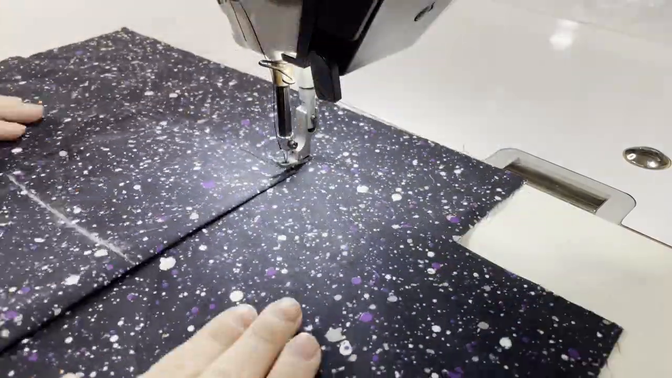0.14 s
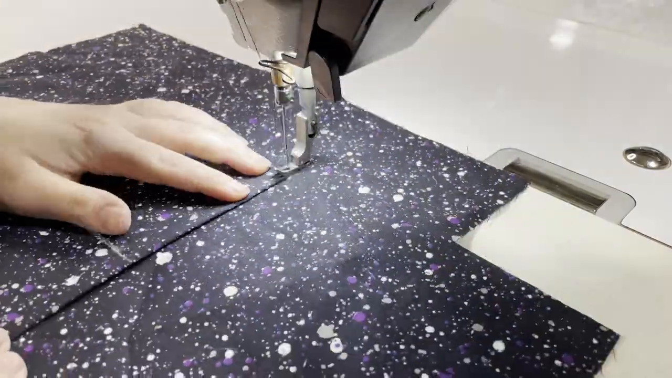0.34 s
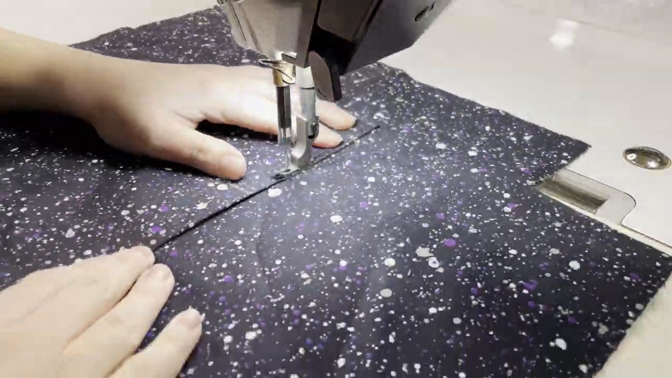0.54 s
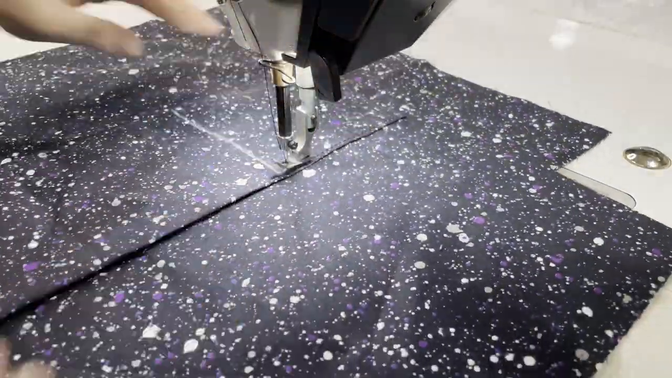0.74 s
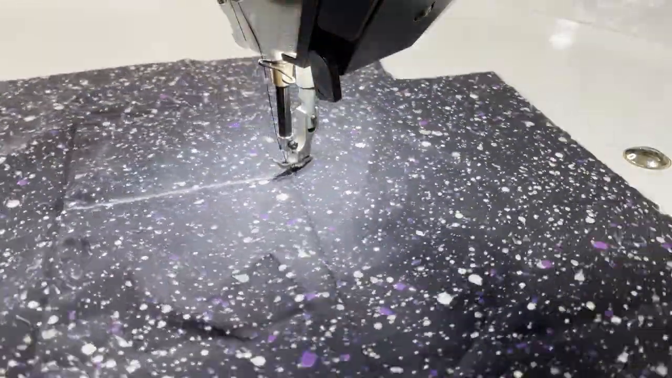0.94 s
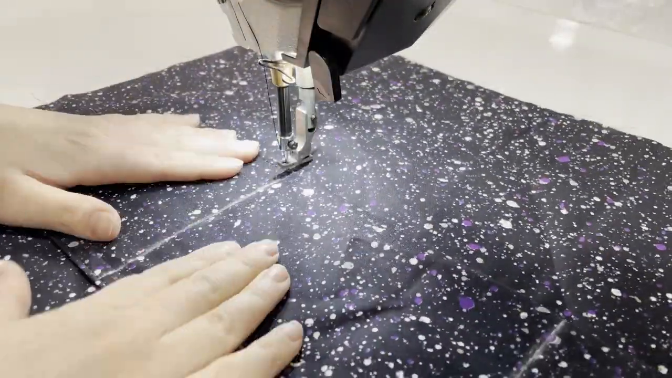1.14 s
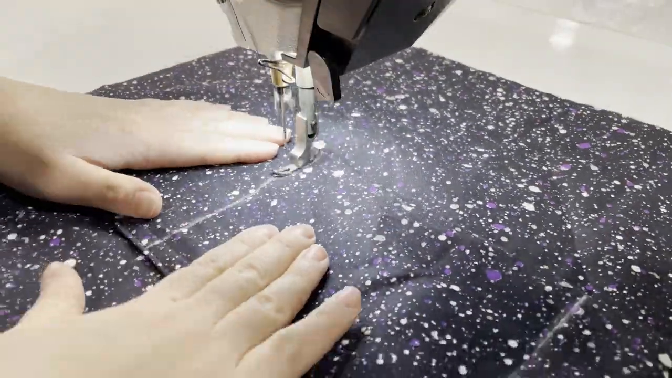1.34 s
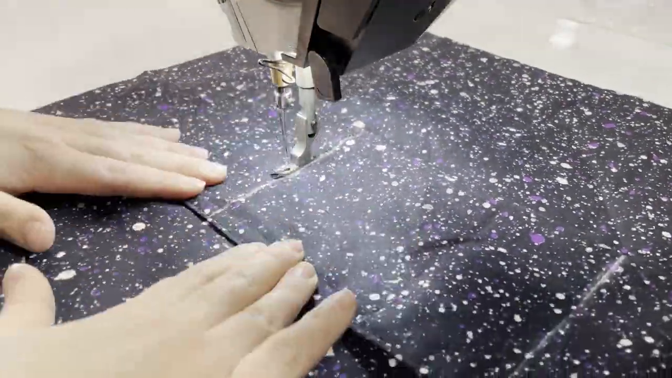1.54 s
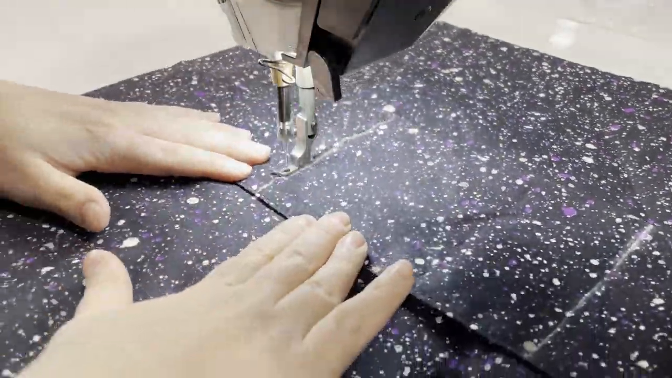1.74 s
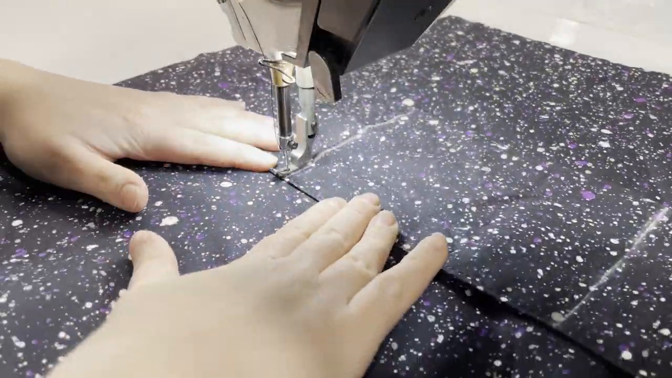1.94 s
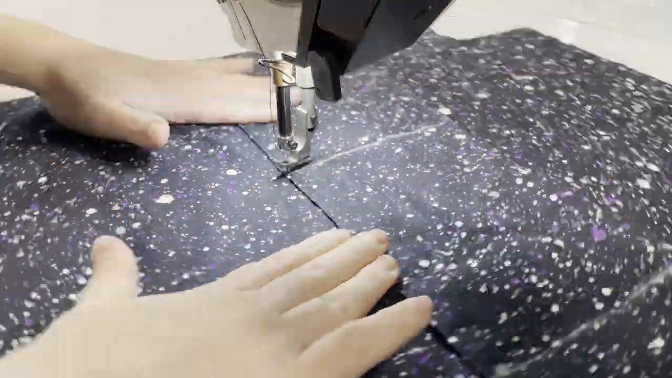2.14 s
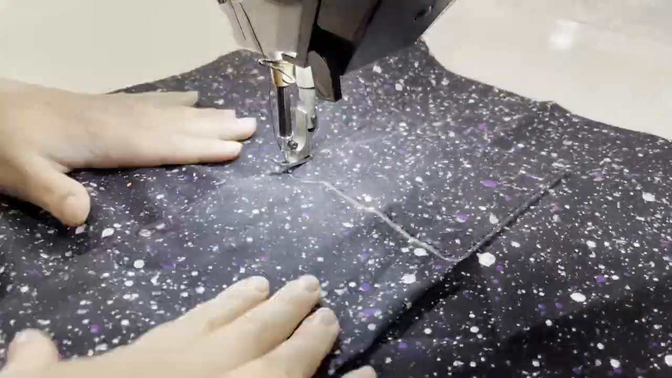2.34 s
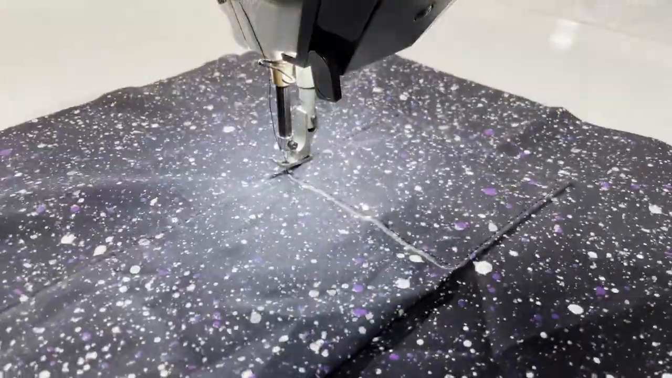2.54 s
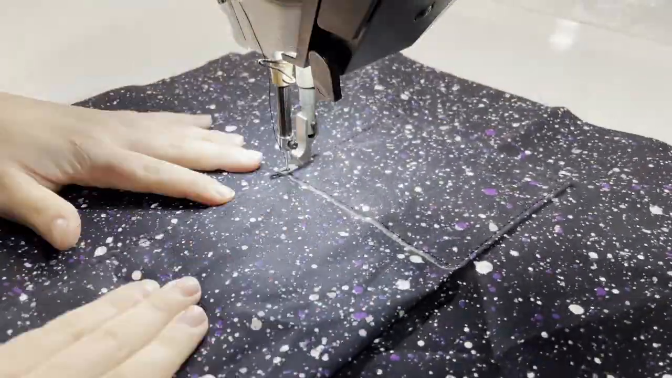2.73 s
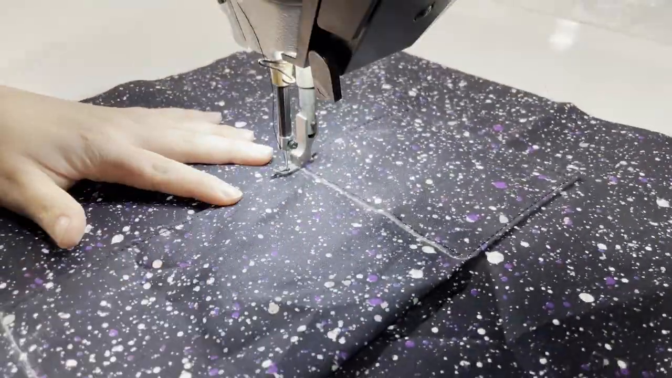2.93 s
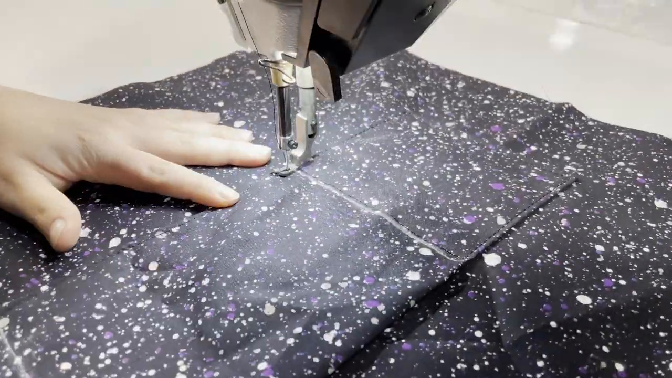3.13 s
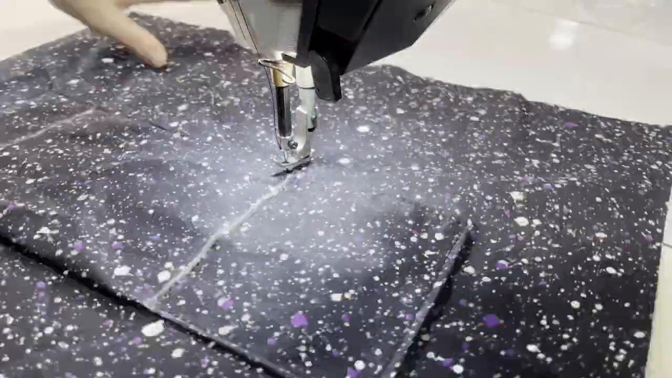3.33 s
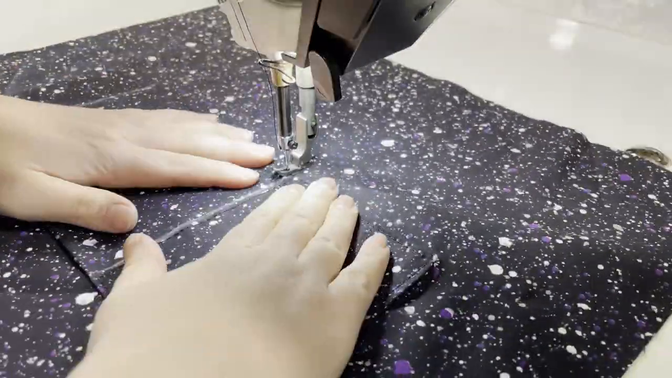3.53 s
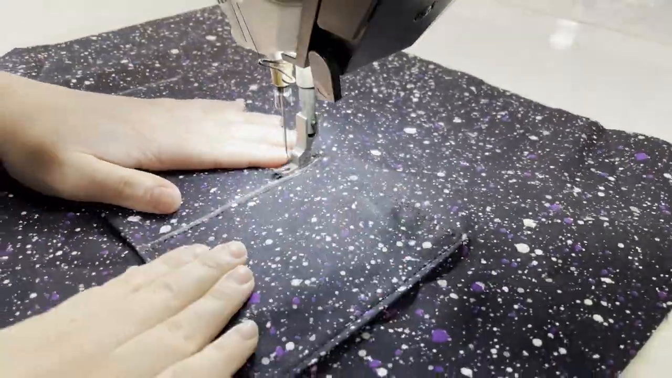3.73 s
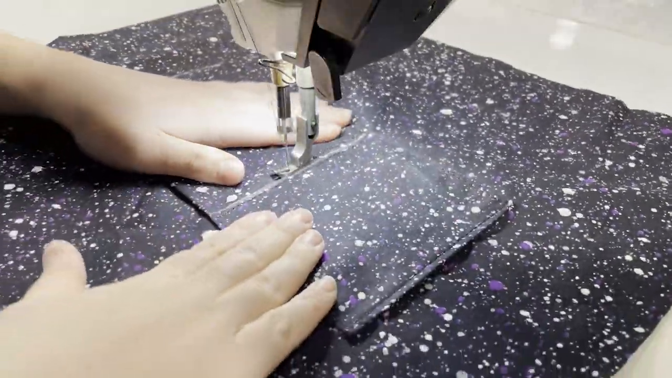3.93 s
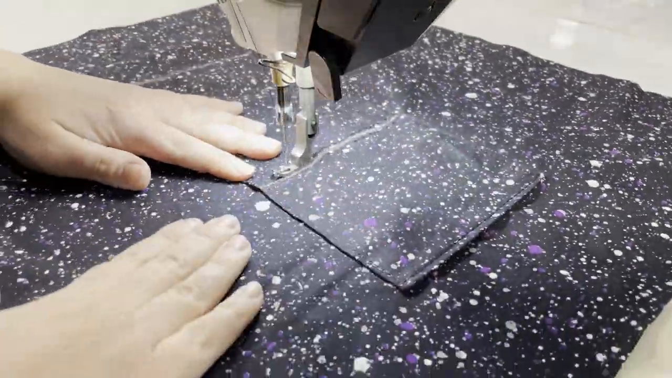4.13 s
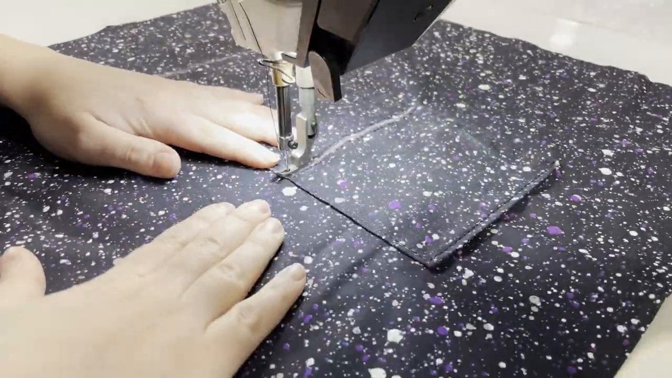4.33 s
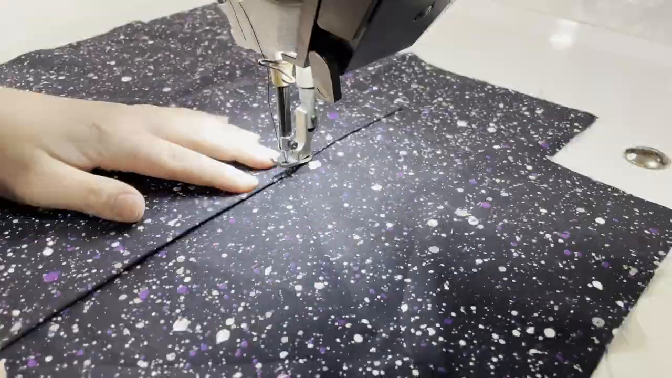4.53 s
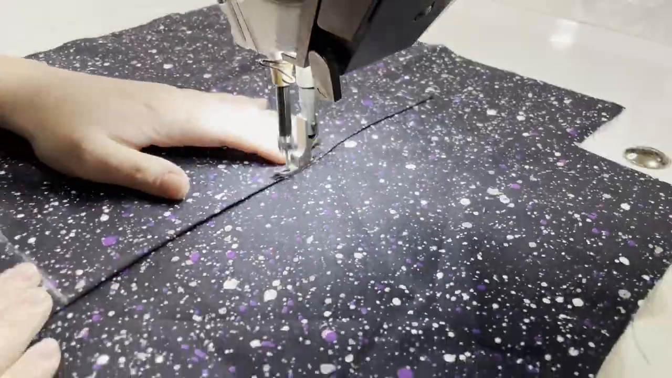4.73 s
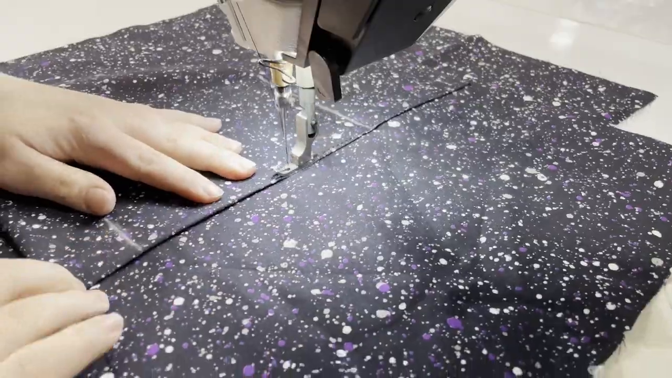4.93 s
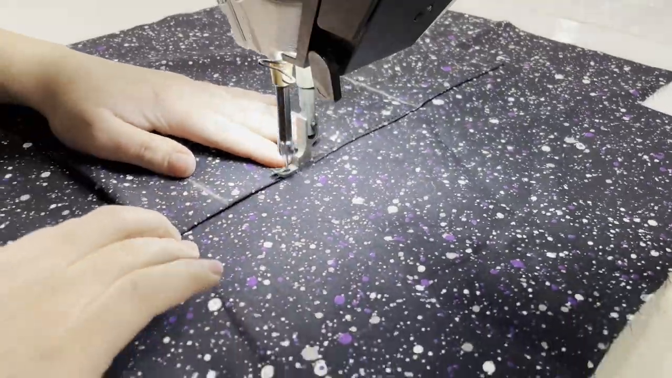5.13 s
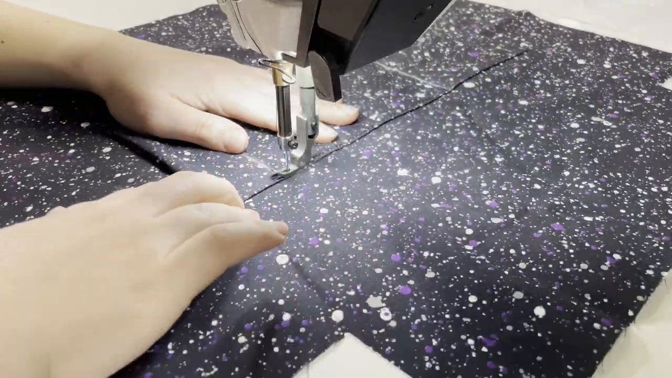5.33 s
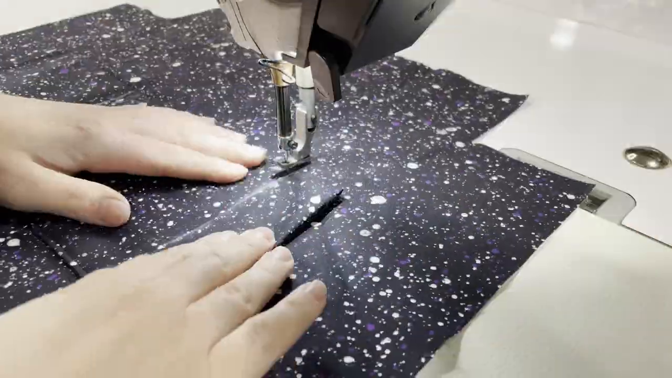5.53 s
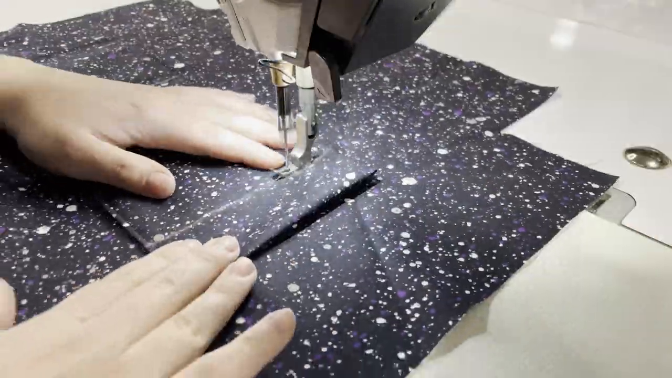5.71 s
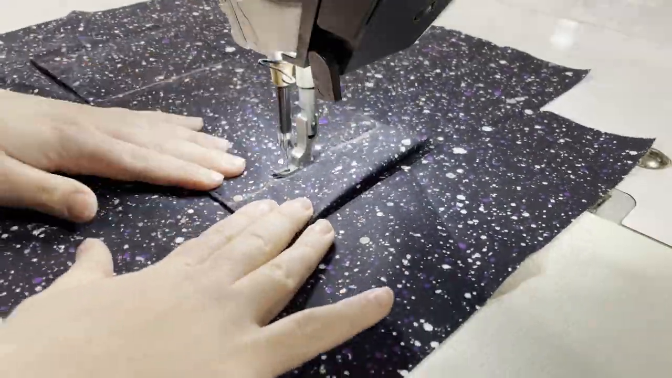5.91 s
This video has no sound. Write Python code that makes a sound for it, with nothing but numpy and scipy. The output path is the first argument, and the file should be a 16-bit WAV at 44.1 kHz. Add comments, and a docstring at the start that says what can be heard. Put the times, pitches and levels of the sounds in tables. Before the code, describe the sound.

A fast sewing machine, heard very close, stitches in six sharp rattling bursts separated by clacks, ticks and soft rustling of cloth.

```python
"""Fast sewing machine, close by

A sewing machine stitches in bursts. Each stitch excites the arm's resonances at seven contacts, the two strongest
half a turn apart, and pings the hook, while gears and thread hiss in step with the shaft. A solenoid clacks and
a clutch ticks around the bursts as impulses on resonators, a lever squeaks by slipping repeatedly, hands tap and
rustle the cloth as damped noise and tones, and the idling drive is steady shaped noise with a faint hum.
"""
import sys
import numpy as np
from scipy import signal
from scipy.fft import rfft, irfft, next_fast_len
from scipy.io import wavfile
from scipy.ndimage import uniform_filter1d, map_coordinates

SR = 44100
rng = np.random.default_rng(int(sys.argv[2]) if len(sys.argv) > 2 else 0)


def waveform_to_disk(signal):
    """Save audio, clipped to [-1, 1], as 16-bit WAV at the path in sys.argv[1]."""
    frames = np.transpose(np.atleast_2d(signal))
    scaled = np.clip(frames, -1, 1) * 32767
    samples = np.round(scaled).astype(np.int16)
    wavfile.write(sys.argv[1], SR, samples)


N = 267687
T = np.arange(N) / SR

# resonances of the lever: f/Hz, width/Hz, level/dB
LEVER_MODES = [(1360, 34, -10), (3826, 140, 1), (3930, 420, -25), (4960, 160, -18), (7460, 250, -5),
               (11200, 960, -14)]
# speed of the stitching, held in plateaus with quick steps, one list per burst: t/s, speed/(stitches/s)
SPEED_STEPS = [
    [(.3715, 41.9), (.393, 87), (.416, 109.74), (.4889, 86.6), (.512, 76.9), (.551, 67.95), (.6393, 54.5),
     (.676, 35.2), (.73, 0)],
    [(1.283, 72), (1.2955, 83.25), (1.3916, 67.57), (1.436, 54.05), (1.473, 33.33), (1.623, 37.74),
     (1.676, 44.94), (1.8095, 41.15), (1.931, 21), (1.95, 0)],
    [(2.8, 37.25), (2.851, 33.3), (2.893, 0)],
    [(3.589, 39.1), (3.612, 33.9), (3.671, 37.38), (3.778, 41.67), (3.802, 52.63), (4.0263, 41.53),
     (4.2477, 34.9), (4.32, 0)],
    [(4.656, 45), (4.676, 66.7), (4.691, 74.63), (4.758, 68.18), (4.802, 60), (4.852, 45.45), (4.94, 47.62),
     (4.982, 60.6), (5.015, 64.15), (5.285, 52.5), (5.317, 33.3), (5.36, 0)],
    [(5.645, 47.4), (5.664, 71.4), (5.678, 79.79), (5.7908, 70.9), (5.819, 64.9), (5.896, 52.79), (6.07, 0)],
]
# starts of the slow turns that park the needle: t/s
PARK_STARTS = [2.010, 3.089, 4.373, 5.403]
PARK_S = .047  # duration of each parking turn, s


def amp(db):
    """Amplitude ratio from a level in dB: 20 dB is a factor of ten."""
    return 10 ** (np.asarray(db) / 20)


def unit(x):
    """Normalization to unit rms amplitude."""
    return x / np.sqrt(np.mean(x ** 2) + 1e-20)


def along(points, hz):
    """Interpolation of (f/Hz, value) points, linear on a logarithmic frequency axis."""
    f, value = np.transpose(points)
    return np.interp(np.log(hz + 1), np.log(f + 1), value)


def gain(tables, col=1):
    """Amplitude envelope from level curves linear in dB, practically silent between the tables."""
    total = 0
    for rows in tables:
        t, db = np.transpose(rows)[[0, col]]
        total = total + amp(np.interp(T, t, db, -200, -200))
    return total


def wobble(rate):
    """Slow random modulation: a smooth curve through rate random knots per second."""
    knots = rng.standard_normal(int(N * rate / SR) + 4)
    return map_coordinates(knots, [T * rate])


def filtered(x, response):
    """Linear filtering: the spectrum is multiplied by a complex frequency response."""
    m = next_fast_len(N + SR // 2)
    f = np.fft.rfftfreq(m, 1 / SR)
    return irfft(rfft(x, m) * response(f), m)[..., :N]


def modes(table):
    """Modal superposition: damped resonators of f/Hz, width/Hz, level/dB, with alternating signs."""
    def response(f):
        total = 0
        for k, (centre, width, db) in enumerate(table):
            damping = 1j * f * width
            total = total + (-1) ** k * amp(db) * damping / (centre ** 2 - f ** 2 + damping)
        return total
    return response


def bursts(times, db, t60, hold=0.):
    """Exponential decay: an envelope that jumps at each time, holds and falls 60 dB in t60 seconds."""
    t = np.arange(SR // 8) / SR
    starts = np.bincount((np.asarray(times) * SR).astype(int).clip(0, N - 1), amp(db), N)
    decay = amp(-60 * np.maximum(t - hold, 0) / t60)
    return np.abs(signal.fftconvolve(starts, decay)[:N])


def hiss(response):
    """Partial coherence: mid and side noises mix into a band-limited stereo noise of rms 1."""
    # correlation of the two ports: f/Hz, share in common 0-1
    coherence = [(100, 0.84), (1400, 0.57), (3000, 0.84), (6000, 0.33), (15000, 0.46)]
    top_hz = 15750

    def shares(hz):
        angle = np.arccos(np.clip(along(coherence, hz), 0, 1)) / 2
        return response(hz) * (hz < top_hz) * [np.cos(angle), np.sin(angle)]
    mid, side = filtered(rng.standard_normal((2, N)), shares)
    return unit(np.array([mid + side, mid - side]))


def rest():
    """Broadband noise of the idling drive and the room, coloured by a few bands, over a faint tonal hum."""
    # spectrum of the hiss: f/Hz, relative density level/dB
    spectrum = [(88, -73), (150, -31.5), (586, -6.5), (1460, -12.5), (1580, -12.5), (2620, -0.5),
                (3310, -12), (4100, -2.5), (4610, -11), (7210, -3), (8760, -14), (9650, -6.5),
                (10400, -14.5), (13400, -18.5), (15700, -23.5)]
    # broad resonances added to it: f/Hz, width/Hz, level/dB
    broad_bands = [(2850, 600, -6.5), (4140, 1100, -12.5), (6980, 260, -7), (8070, 430, 0), (9520, 190, 5)]

    def colour(hz):
        bands = np.abs(modes(broad_bands)(hz))
        return amp(along(spectrum, hz)) * (0.93 + 0.62 * bands)
    noise = hiss(colour)
    hum = amp(-72 + 2.5 * wobble(8)) * np.sin(2 * np.pi * 593 * T)
    level = amp(-54 + 0.72 * wobble(1.3) + 1.57 * wobble(30.07))
    return level * noise + hum


def room(x):
    """Reverberation: convolution with noise whose decay time depends on frequency, independent at each port."""
    # reverberation time: f/Hz, t60/s
    decay_times = [(300, 0.12), (2000, 0.091), (10000, 0.041)]
    hz, t, z = signal.stft(rng.standard_normal((2, SR // 4)), SR, nperseg=256)
    decay = amp(-60 * t / along(decay_times, hz)[:, None])
    tail = signal.istft(z * decay, SR, nperseg=256)[1]
    tail = tail / np.linalg.norm(tail[0])
    delayed = np.pad(x, (100, 0))[None]  # 100 samples later than the direct sound
    return signal.fftconvolve(delayed, tail, axes=1)[:, :N]


def hands():
    """Heavily damped impacts: soft taps of a few cycles plus noise, among many faint rustles of cloth."""
    # taps of fingers and cloth on the table: t/s, relative level/dB, f/Hz
    tap_events = [(0.818, -52.5, 1260), (0.936, -56.5, 1280), (1.109, -54, 855), (1.181, -61, 620),
                  (2.226, -51, 1440), (2.245, -59, 668), (2.267, -58, 576), (2.301, -54, 730),
                  (2.381, -68, 600), (2.416, -55, 1380), (2.472, -57, 1200), (2.498, -49, 530),
                  (2.511, -53, 587), (2.539, -55, 517), (2.584, -60, 1400), (2.643, -62, 651),
                  (2.739, -60, 820), (2.944, -55.5, 536), (3.363, -53, 1060), (3.401, -49.5, 1160)]
    taps, t = np.zeros(N + SR), np.arange(SR // 20) / SR
    for s, db, hz in tap_events:
        decay = amp(db + 12.0 - 60 * t / 0.016)
        tap = np.sin(2 * np.pi * hz * t) + 1.35 * rng.standard_normal(len(t))
        taps[round(s * SR):][:len(t)] += decay * tap
    at = rng.uniform(0, N / SR, 150)
    rustle_db = -62 + 4 * rng.standard_exponential(len(at))
    rustle = bursts(at, rustle_db, 0.035) * rng.standard_normal(N)
    soften = lambda f: 1j * f / (450 + 1j * f) / (1 + 1j * f / 1500) ** 2
    return filtered(taps[:N] + rustle, soften)


def lever():
    """Stick-slip friction: a squeak is a train of short scrapes, each ringing the lever's resonances."""
    # squeaks: t/s, length/s, relative peak level/dB, place of the peak 0-1
    squeaks = [(2.995, .012, -29, .01), (3.015, .013, -31, .7), (3.089, .004, -41, .1),
               (3.119, .021, -32, .7), (3.182, .016, -33, .4), (3.213, .021, -33, .45)]
    gap_s, scatter = .0055, .08  # time between slips and its random share
    fall_db = 12  # fall over a whole length away from the peak
    chance = rng.standard_normal((len(squeaks), 6, 2))
    start, length, peak_db, peak_at = np.transpose(squeaks)[..., None]
    place = gap_s * np.arange(6) * (1 + scatter * chance[..., 0]) / length
    slip_db = peak_db - fall_db * np.abs(place - peak_at) + 4.5 * chance[..., 1]
    inside = place < 1
    s, db = (start + place * length)[inside], slip_db[inside]
    scrape = bursts(s, db + 11, 0.013, 0.0016) * rng.standard_normal(N)
    impulse = bursts(s, db + 26.5, 0.00021)
    return filtered(scrape + impulse, modes(LEVER_MODES))


def solenoids():
    """Impact excitation: clacks strike, shake and bounce in a resonant housing; bright ticks ping the lever."""
    # presser-foot solenoid: t/s, relative level/dB, brightness/dB
    clacks = [(0.003, -25.5, -16.5), (0.316, -29, -20.5), (0.753, -31.5, -20), (1.228, -30, -20),
              (2.13, -32, -21.5), (2.71, -31, -21), (3.269, -32.5, -21), (3.534, -29.5, -20.5),
              (4.446, -32, -21.5), (4.604, -29.5, -21.5), (5.46, -31.5, -21), (5.59, -30.5, -20)]
    # clutch ticks: t/s, relative level/dB
    clutch_ticks = [(0.3722, -28), (1.283, -28.5), (2.0108, -25), (2.8012, -28.5), (3.0884, -27),
                    (3.1317, -26.5), (3.5895, -27.5), (4.373, -28.5), (4.6556, -28.5), (5.4035, -29.5),
                    (5.645, -26)]
    # spectrum of a tick: f/Hz, relative density level/dB
    tick_spectrum = [(3000, -70), (3800, 2), (5000, -45), (7500, 1.5), (10000, -9.5), (13500, -3.5),
                     (16500, -10)]
    # resonances of the solenoid's housing: f/Hz, width/Hz, level/dB
    housing_modes = [(814, 230, -1.5), (1296, 107, 3), (1430, 82, -3), (1950, 123, 5), (2590, 350, -0.5),
                     (2820, 350, 4), (3750, 230, 3.5), (3780, 340, 0)]

    def noise(points):
        return unit(filtered(rng.standard_normal(N), lambda hz: amp(along(points, hz))))

    s, db, bright_db = np.transpose(clacks)
    shake = bursts(s + 0.001, db - 2.5, 0.0073, 0.0075) + bursts(s + .001, db - 17.0, 0.041, 0.016)
    shake = shake * rng.standard_normal(N)
    strike = bursts(s + 0.001862, db + 19.0, 0.00014)
    bounce = bursts(s + 0.0073, db + 6, 0.00028)
    body = filtered(strike + bounce + shake, modes(housing_modes))
    snap_noise = noise([(4500, -8), (5500, 2.5), (16500, -5)])  # f/Hz, density level/dB
    snap = bursts(s + 0.00027, db + bright_db + 13.5, 0.02) * snap_noise

    s, db = np.transpose(clutch_ticks)
    tick = (bursts(s, db - 3, 0.0042, 0.00036) + bursts(s, db - 18, 0.046)) * noise(tick_spectrum)
    spark = filtered(bursts(s, db + 15, .00005), lambda hz: amp(along(tick_spectrum, hz)))
    table_shake = lambda f: 1j * f / (40 + 1j * f) / (1 + 1j * f / 120) ** 2
    thud = filtered(bursts(s, db - 22.5, .03, 0.0018), table_shake)
    lever_ping = filtered(bursts(s + .001, db + 5, 0.00019), modes(LEVER_MODES[1:2]))
    return thud + body + snap + tick + spark + lever_ping


def shaft():
    """Rotation as integrated speed: sample times, stitches done and speed for each burst and parking turn."""
    run_from, park_from = -.9, .06  # shaft position at the start, stitches
    park_rate = 19  # stitches/s
    step_s = .012  # time the shaft takes to reach a new speed
    plans = [(rows, run_from) for rows in SPEED_STEPS]
    plans += [([(s, park_rate), (s + PARK_S, 0)], park_from) for s in PARK_STARTS]
    out = []
    for rows, start in plans:
        s, rate = np.transpose(rows)
        t = np.arange(s[0], s[-1], 1 / SR)
        steps = rate[np.searchsorted(s, t, "right") - 1]
        speed = uniform_filter1d(steps, size=int(step_s * SR))
        out.append((t, start + np.cumsum(speed) / SR, speed))
    return out


def turns():
    """Phase and rate of the rotation: stitches done and stitches/s at each sample."""
    parts = shaft()
    done = sum(np.interp(T, t, d) for t, d, v in parts)
    speed = sum(np.interp(T, t, v, 0, 0) for t, d, v in parts)
    return done, speed


def moments(offset, jitter):
    """Periodic excitation: times in s at which the shaft passes one angle, with random jitter in s."""
    angles = np.arange(-1, 45) + offset
    s = np.concatenate([np.interp(angles, done, t, -1, -1) for t, done, v in shaft()])
    return (s + jitter * rng.standard_normal(len(s)))[s > 0]


def drive():
    """Power laws of speed, scaled by load: whirr and upper modes grow, knocks stay nearly level."""
    # loading of the needle by the cloth, one list per burst: t/s, load/dB, gear hiss/dB
    loads = [
        [(.372, -9, 0), (.405, 1.5, 1.5), (.55, -1, 0.5), (.65, -1, 0.5), (.71, 0.5, -0.5), (.73, -11, -8)],
        [(1.283, -4.5, -4), (1.33, 2, 0), (1.45, 1, 0), (1.49, -2, 1.5), (1.65, -1.5, -1), (1.71, 1, 4),
         (1.79, 0, 4.5), (1.87, 0.5, -0.5), (1.95, -5.5, 0.5)],
        [(2.8, 2.5, -2.5), (2.893, 0.5, 1.5)],
        [(3.589, 5.5, 2), (3.63, -5, 0.5), (3.77, -1, 0), (3.82, -1.5, 0), (4.15, 1.5, 0), (4.3, -0.5, 0.5),
         (4.32, -8, -5)],
        [(4.656, -1, 1), (4.7, -0.5, -1), (4.87, -1.5, 1.5), (5.24, 0, -1), (5.36, -2, 1)],
        [(5.645, -7, -2.5), (5.68, 4, 1), (5.77, -0.5, -1.5), (5.82, 1, -0.5), (6.07, 0.5, -0.5)],
    ]
    # level accents on single stitches, mostly harder hits: t/s, level change/dB
    stitch_accents = [(.405, 3), (.416, 0), (.538, 4), (.656, -0.5), (1.319, 9), (1.343, 5.5), (1.42, 2.5),
                      (1.436, 3.5), (1.74, 4.5), (3.82, 6), (3.839, 6), (3.954, 3), (4.011, 4),
                      (4.126, 2.5), (4.758, 2.5), (5.094, 3), (5.777, 7), (5.79, 6), (5.99, 3), (6.009, 2)]
    accent_s, edge_s = .004, 0.0087  # scale of an accent; time in which the drive grips and lets go
    cruise = 50  # stitches/s
    knock_db, whirr_db, upper_db = -49, -47.5, 1  # at cruise
    knock_per_oct, whirr_per_oct, upper_per_oct = -0.7, 5.5, 2.5  # dB per doubling of speed
    park_knock_db, park_whirr_db, park_fade = -49.5, -45.5, 198  # the last in dB/s
    octaves = np.log2(np.maximum(turns()[1], 10) / cruise)

    def soft(x):
        return np.abs(uniform_filter1d(x, size=int(edge_s * SR)))

    load = gain(loads)
    parking = gain([[(s, 0), (s + PARK_S, -park_fade * PARK_S)] for s in PARK_STARTS])
    accent = amp(sum(db * np.exp(-((T - s - accent_s / 2) / accent_s) ** 4) for s, db in stitch_accents))
    run_knock = load * amp(knock_db + knock_per_oct * octaves)
    knock = soft(run_knock + amp(park_knock_db) * (parking > 1e-6)) * accent
    # the clutch hisses as it takes hold at the start of each burst
    slip = bursts([rows[0][0] for rows in SPEED_STEPS], np.full(len(SPEED_STEPS), -49), 0.03)
    gears = gain(loads, col=2)
    run_whirr = gears * amp(whirr_db + whirr_per_oct * octaves)
    gear_gain = soft(run_whirr + amp(park_whirr_db) * parking) + slip
    return knock, gear_gain, amp(upper_db + upper_per_oct * octaves)


def whirr():
    """Shaft-rate modulation: gears and thread hiss in pulses, hook parts ping once a stitch, a bearing sings."""
    # resonances of the hook, each filtering twice: f/Hz, width/Hz of one pass, mean blow level/dB
    hook_modes = [(7100, 560, -4.5), (8350, 430, -3), (11060, 760, 4), (12950, 330, -3.5), (13840, 210, 2)]
    # place of each hook ping in the stitch: 0-1
    hook_moments = [.5, .3, .72, .6, .1]
    # spectrum of gears and thread: f/Hz, relative density level/dB
    spectrum = [(1350, -23), (2300, -6), (2790, -3.5), (5520, -8), (6920, -1), (7800, -4), (8390, -4),
                (10200, -6), (11100, -4), (15700, -8.5)]
    sing_from, sing_db, sing_slope = 85, -46, .25  # stitches/s; dB at top speed; dB per stitch/s below it
    pings = 0
    for (hz, width, db), moment in zip(hook_modes, hook_moments):
        at = moments(moment, 0.00046)
        blow = bursts(at, rng.normal(db, 5.2, len(at)), 0.0024, 0.00077) * rng.standard_normal(N)
        pings = pings + filtered(blow, lambda f: modes([(hz, width, 0)])(f) ** 2)
    done, speed = turns()
    pulse = 1 + .2 * np.cos(2 * np.pi * (done - .8))
    gears = unit(pulse * amp(1.3 * wobble(40)) * hiss(lambda hz: amp(along(spectrum, hz))))
    sing = unit(filtered(rng.standard_normal(N), lambda f: modes([(12300, 30, 0)])(f) ** 2))
    sing_level = (speed > sing_from) * amp(sing_db - sing_slope * (speed.max() - speed))
    whine = sing_level * (1 + .7 * np.cos(2 * np.pi * done)) * sing
    level = drive()[1]
    return amp(0.5) * level * gears + amp(-6) * level * unit(pings) + whine


def knocks():
    """Modal response of the arm to contacts repeated in every stitch, rattling links, gear teeth and lone blows."""
    # resonances of the arm: f/Hz, width/Hz, level/dB
    arm_modes = [(581, 152, -14), (800, 130, -6.5), (1258, 79, 0), (1585, 43, -2.5), (1824, 460, -8),
                 (2014, 123, 1), (2780, 203, -11), (4310, 850, -14.5)]
    # knocks within a stitch: moment 0-1, relative level/dB
    contacts = [(0, 0), (.07, -7), (.16, -11), (.5, -3), (.57, -8), (.68, -12), (.87, -16)]
    # single blows as the needle stops or tacks: t/s, relative level/dB, stop-pin ping/dB
    single_blows = [(0.14, -41, -31), (0.715, -44, -9), (1.937, -33, -18), (2.032, -32, -30),
                    (2.115, -51, -16), (2.872, -32.5, -19), (3.11, -34, -23), (3.132, -35, -17),
                    (4.383, -41.5, -14), (4.408, -37, -18), (5.356, -34, -8), (5.421, -30, -11),
                    (5.438, -43, -20)]
    jitter_s, scatter_db, teeth_count = .000015, 1.8, 24

    groups = [moments(m, jitter_s) - .0015 for m, db in contacts]
    sizes = np.concatenate([rng.normal(db, scatter_db, len(s)) for s, (m, db) in zip(groups, contacts)])
    first = len(groups[0])
    at = np.concatenate(groups)
    # only the first knock is heavy enough to move the whole arm
    light = lambda f: (1j * f / (700 + 1j * f)) ** 2
    heavy_push = bursts(at[:first], sizes[:first], 0.00026)
    light_push = filtered(bursts(at[first:], sizes[first:], 0.00022), light)
    push = unit(heavy_push + light_push)
    rattle = unit((bursts(at, sizes, 0.011) + 0.05) * rng.standard_normal(N))  # loose links

    done, speed = turns()
    meshing = np.clip(speed / 25 - 1, 0, 1)
    teeth = meshing * amp(-3 + 2.0 * wobble(16)) * np.sin(2 * np.pi * teeth_count * done)
    hum = .6 * teeth + 1.3 * filtered(teeth, modes(arm_modes))

    # direct crack of the contact, sounding together with the start of the arm's ringing
    direct = lambda f: 1j * f / (900 + 1j * f) / (1 + 1j * f / 5000)
    crack = amp(-16.5) * unit(filtered(push, direct))
    ringing = unit(filtered(push, modes(arm_modes)))
    loose = amp(-11.5) * unit(filtered(rattle, modes(arm_modes)))
    arm = ringing + crack + loose + hum
    upper = filtered(arm, lambda f: np.exp(-((f - 2000) / 350) ** 4))  # modes around 2 kHz
    level, _, bright = drive()
    arm = arm + (bright - 1) * upper

    s, db, ping_db = np.transpose(single_blows)
    ping = filtered(bursts(s, db + ping_db + 34, 0.00022), modes([(5160, 540, 0)]))
    shove = bursts(s, db + 24, .0007)
    blows = shove + bursts(s, db + 2.5, 0.035, 0.0054) * rng.standard_normal(N)
    dull_arm = lambda f: modes(arm_modes)(f) / (1 + 1j * f / 3000)
    return level * arm + ping + filtered(blows, dull_arm)


def scene():
    """Superposition: impacts with their reverberation, plus the whirr and the resting noise."""
    near = knocks() + solenoids() + lever() + hands()
    return near + amp(-17.5) * room(near) + whirr() + rest()


def record(dry):
    """Stereo by level and phase difference between two ports, with a bass cut and a band limit."""
    # level difference: f/Hz, left minus right/dB
    level_difference = [(60, 3), (130, -4), (290, 0), (640, -1), (1410, -3), (3100, 0.5), (6820, -2.5),
                        (15000, 0)]
    # phase difference: f/Hz, lead of the left/rad
    phase_lead = [(100, 0.7), (3190, 0.25), (4480, 1.23), (5080, 0.76), (6120, -0.6), (7060, -5.5),
                  (7580, -2), (8530, -6), (9300, -4.0), (11000, -4.5), (12600, 1.1), (13000, 0),
                  (13400, -2.2), (15700, -1), (16400, -16.5)]
    top_hz = 16700

    def ports(hz):
        half = amp(along(level_difference, hz) / 2) * np.exp(.5j * along(phase_lead, hz))
        return half ** np.array([[1], [-1]])
    bass_cut = lambda hz: (1j * hz / (330 + 1j * hz)) ** 3
    return filtered(dry, lambda hz: ports(hz) * bass_cut(hz) * (hz < top_hz))


dry = scene()
out = record(dry)
waveform_to_disk(out)
```